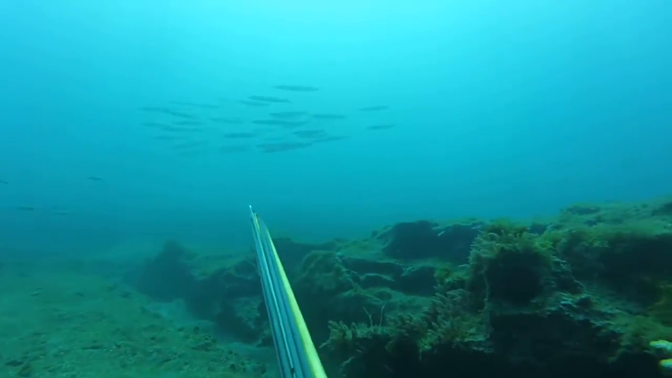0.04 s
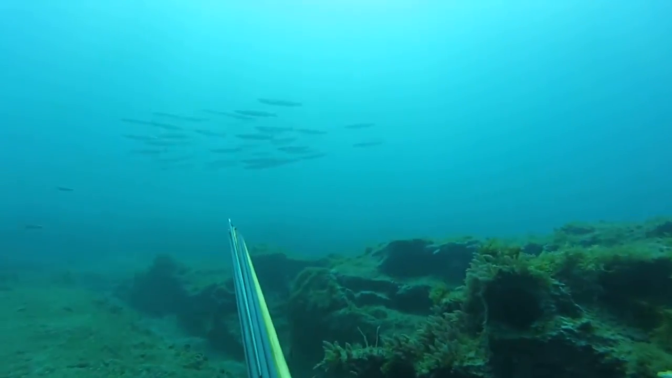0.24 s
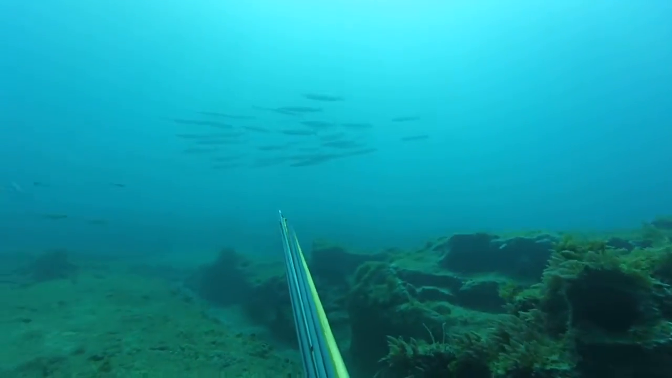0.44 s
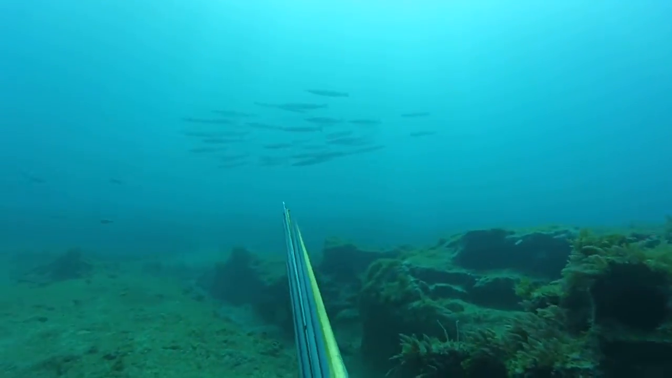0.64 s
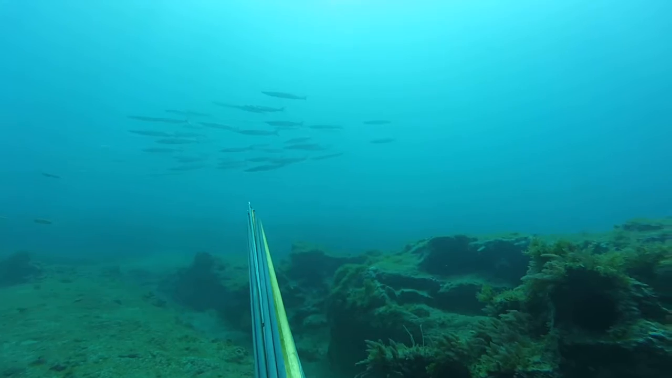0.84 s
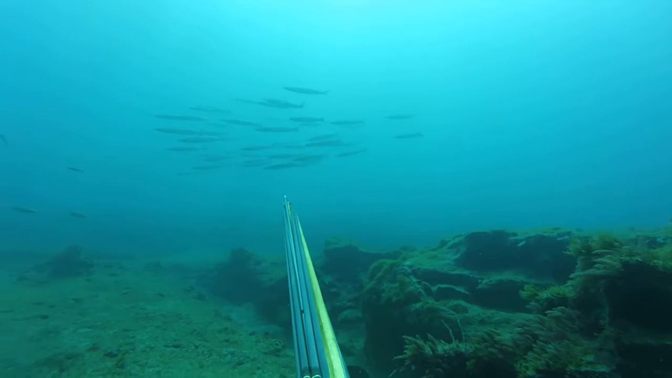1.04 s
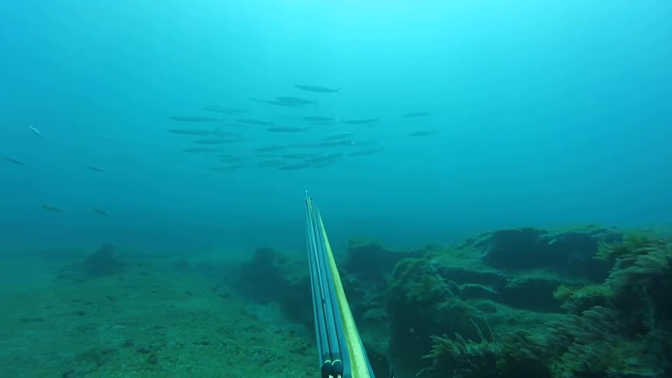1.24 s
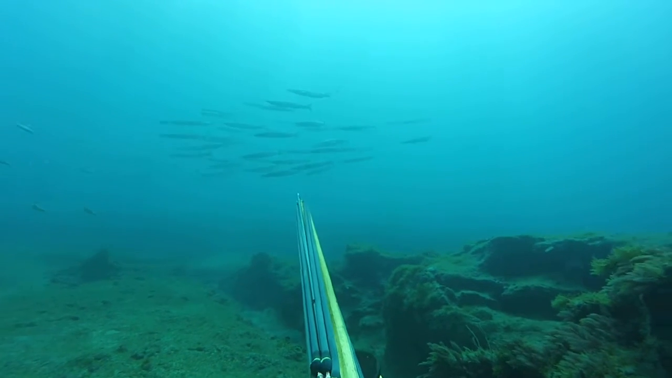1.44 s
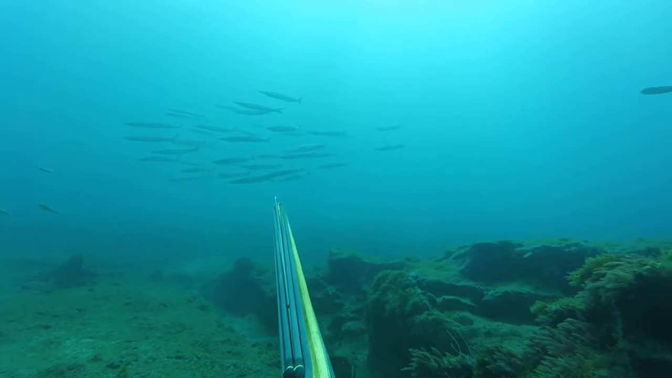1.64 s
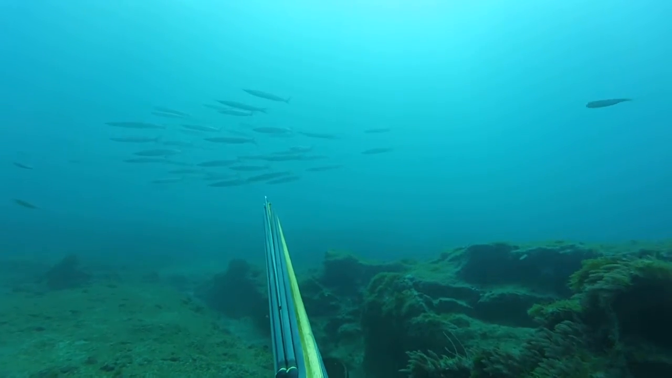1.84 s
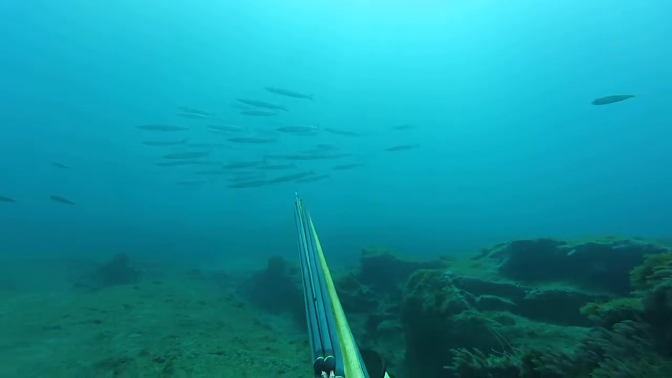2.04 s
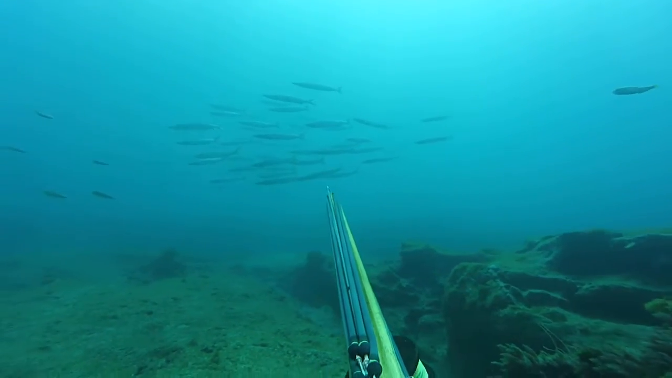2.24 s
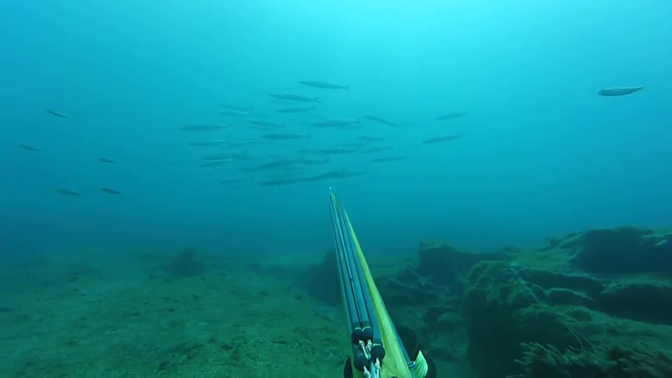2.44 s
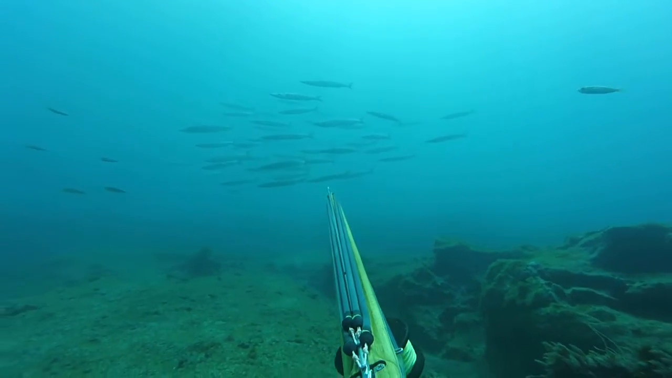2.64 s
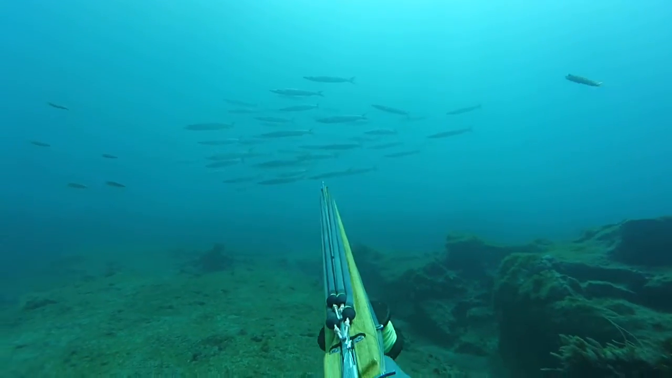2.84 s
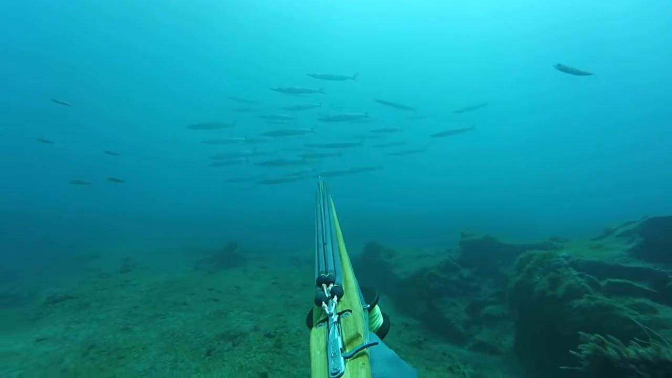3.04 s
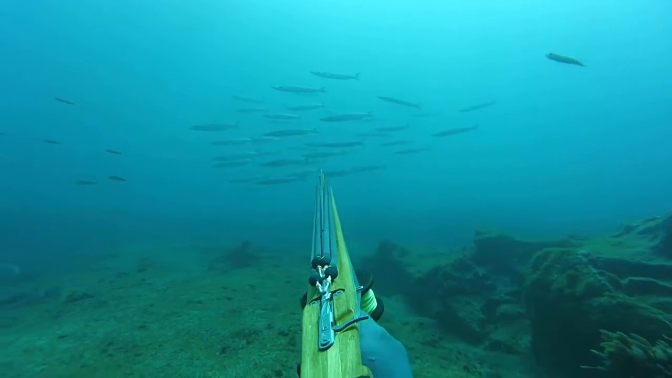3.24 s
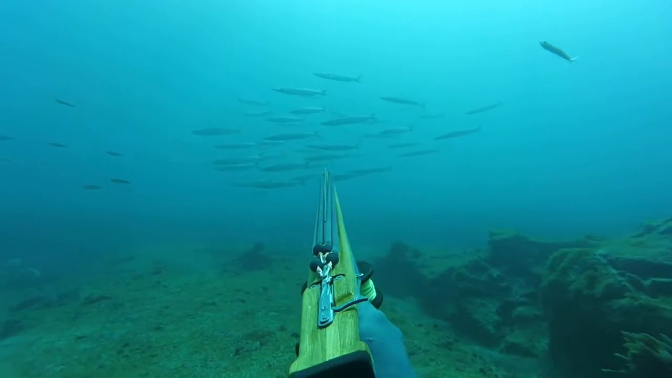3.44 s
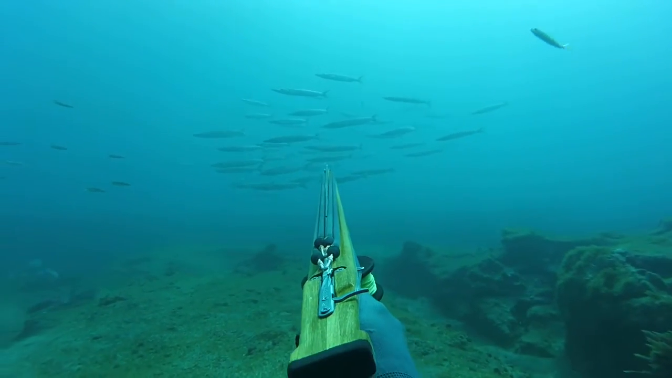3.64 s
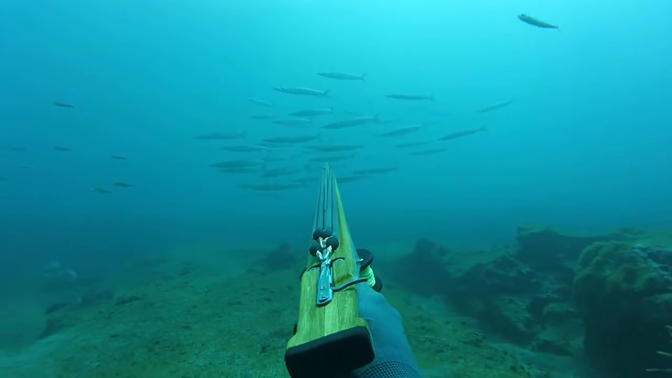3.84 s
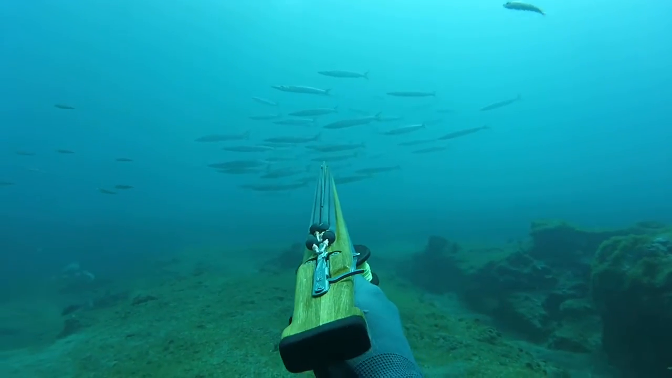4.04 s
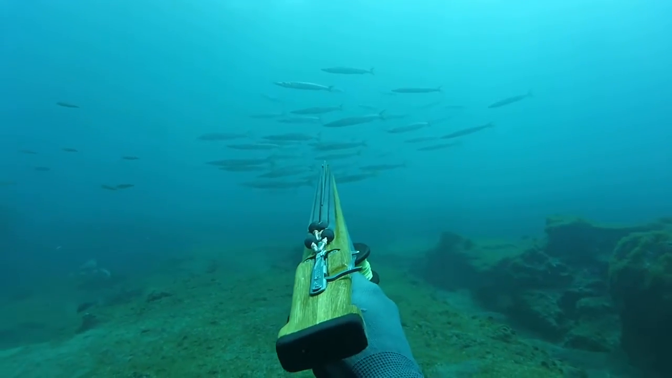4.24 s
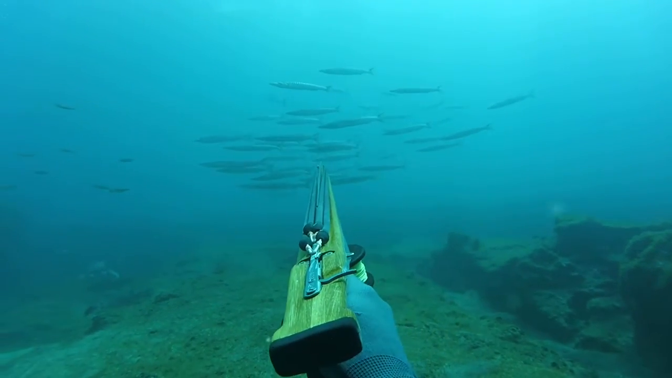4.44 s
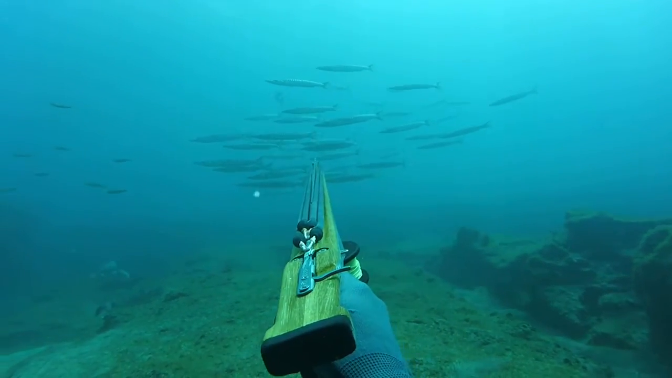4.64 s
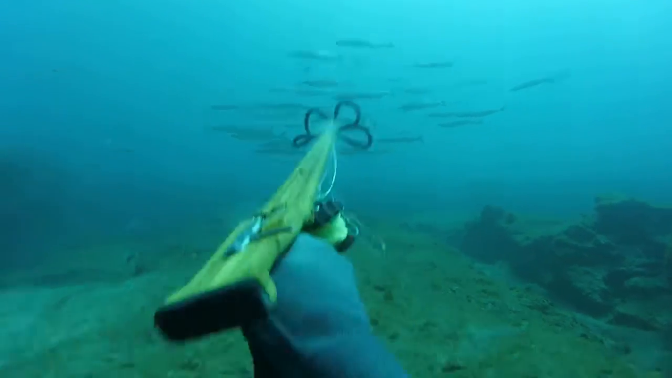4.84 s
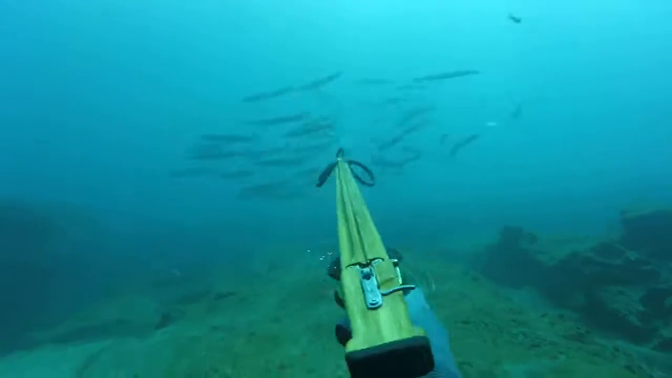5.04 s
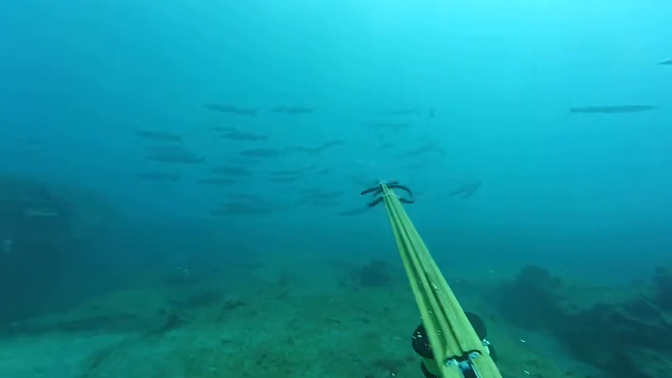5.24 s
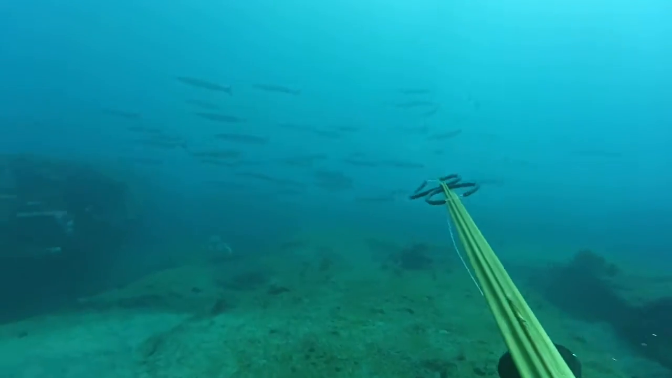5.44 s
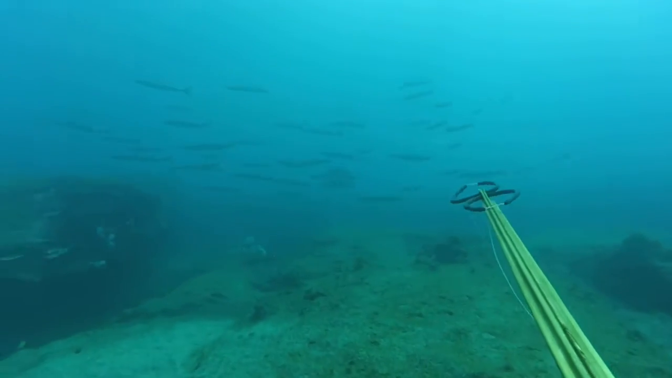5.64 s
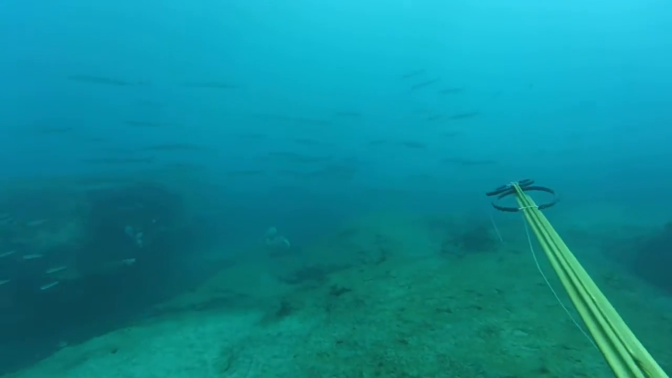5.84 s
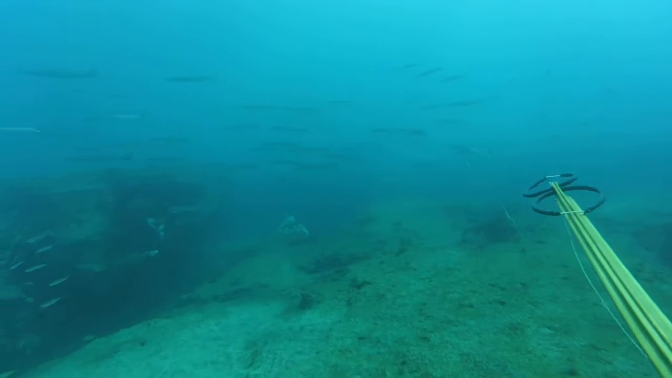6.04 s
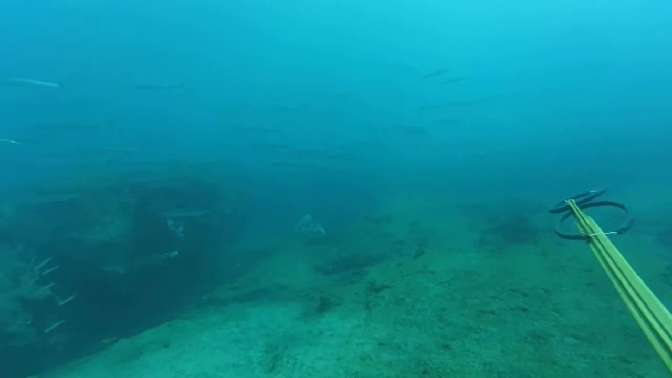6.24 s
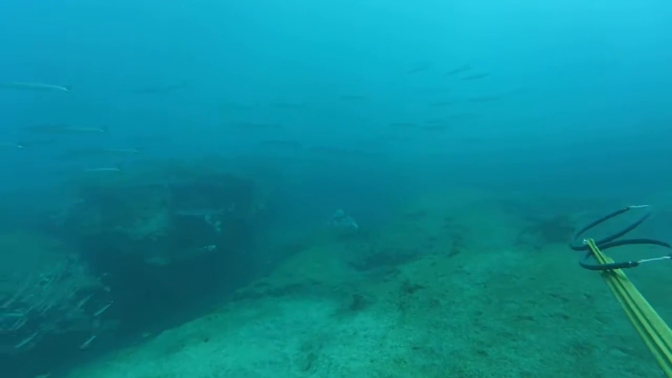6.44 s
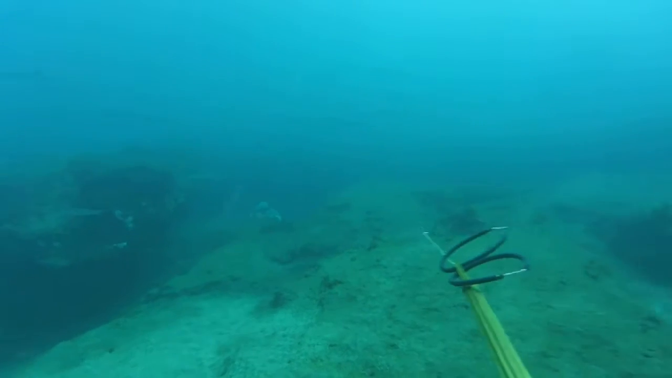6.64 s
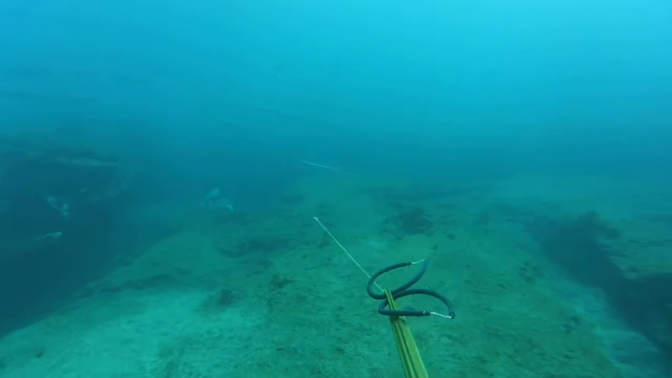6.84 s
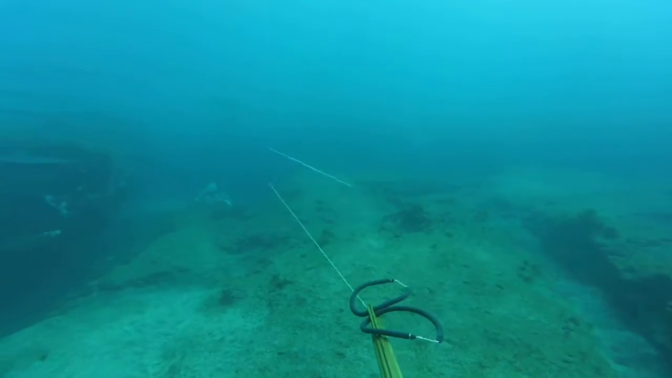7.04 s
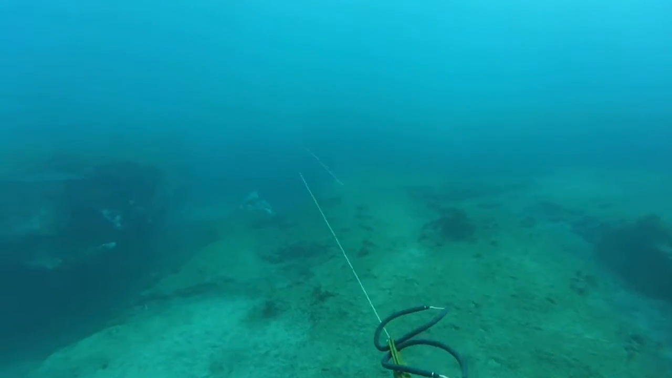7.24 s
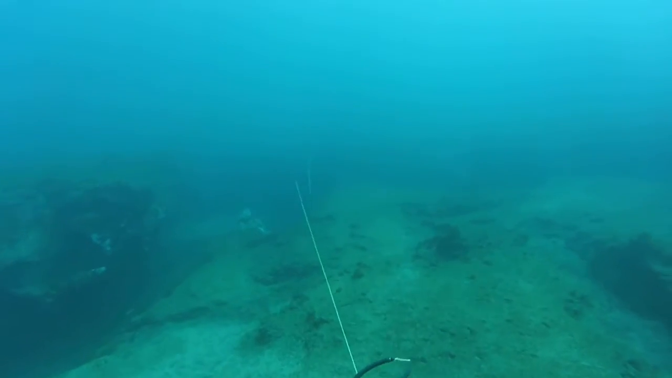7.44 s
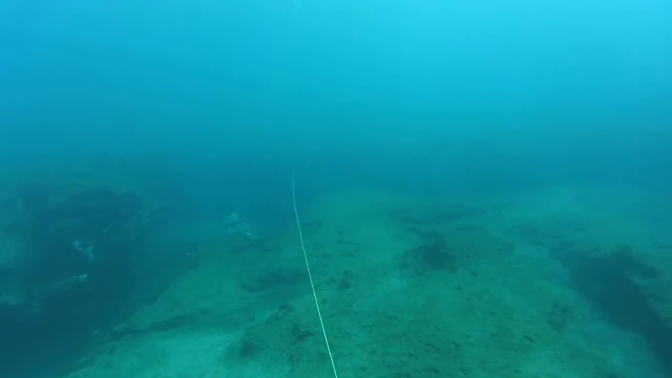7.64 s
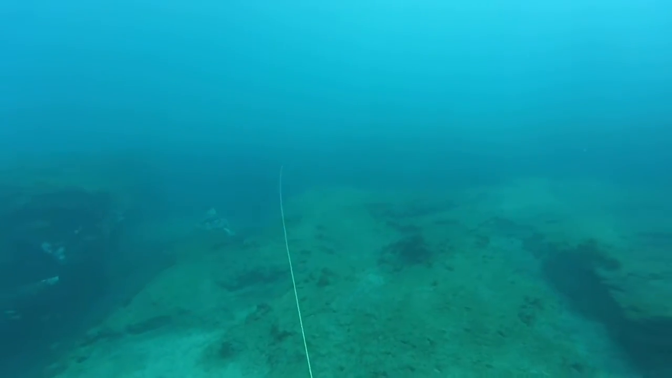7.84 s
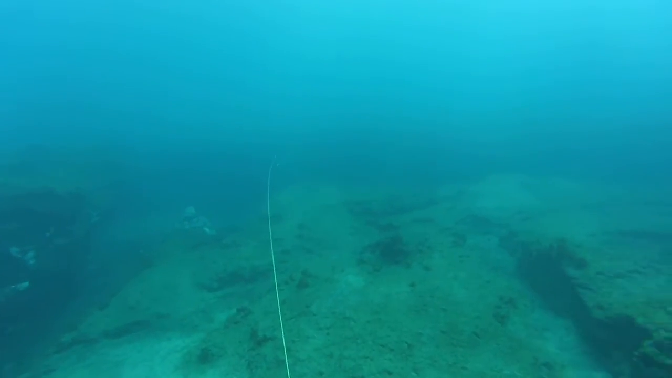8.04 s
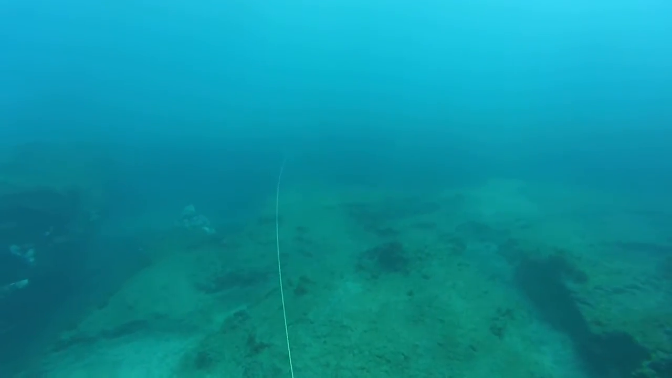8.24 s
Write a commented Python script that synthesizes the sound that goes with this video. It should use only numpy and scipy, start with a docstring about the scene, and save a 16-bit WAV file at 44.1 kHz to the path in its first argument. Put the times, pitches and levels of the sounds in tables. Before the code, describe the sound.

From 0 to 4.8 seconds it is quiet under water: a fine, steady sizzle of snapping shrimp, with brighter dry clicks standing out several times a second, boxy and slightly ringing in the camera housing. Faint low bumps come at times, the clearest a knock near 1.37. At 4.82 the speargun fires, enormously louder and distorted: a hard crack, a rasp swelling for a few hundredths of a second, metallic ringing, rapid slaps and clacks until about 5.0, and a deep kick with low watery surge. It dies away within half a second, while line flicks off in scratchy pitched ticks, weakening until 6.0. Soft bumps come around 6.6 to 6.8 as a reel spins up, whirring and hissing with about sixteen throbs a second near 7, then slowing and softening. A dull bump at 8.13 and a faint, wavering downward groan at 8.2 close it over crackle.

```python
"""A wooden speargun is fired under water: the shaft rasps along its track and overloads the camera.
Its rattle rings the gun, bands and line slap as clicks, and the water surges as low filtered noise.
Then ticking line whips off the stock and whirrs off a reel that throbs with each turn.
Snapping shrimp crackle throughout as clicks and tiny rings coloured by the camera housing.
Soft bumps on it and low clacks of the gun are damped swings; a low groan follows the last."""
import sys
import numpy as np
from scipy import signal
from scipy.fft import rfft, irfft, next_fast_len
from scipy.io import wavfile

SR = 44100
rng = np.random.default_rng(int(sys.argv[2]) if len(sys.argv) > 2 else 0)


def int16_out(signal):
    """Quantize to a 16-bit WAV file."""
    q = np.round(np.clip(np.atleast_2d(signal).T, -1, 1) * 32767)
    wavfile.write(sys.argv[1], SR, q.astype(np.int16))


N = 366030
RELEASE_S = 4.816  # the trigger lets go


def amp(db):
    """Decibels to gain."""
    return 10 ** (np.asarray(db) / 20)


def unit(x):
    """x at rms 1."""
    return x / np.sqrt(np.mean(x ** 2) + 1e-20)


def along(points, hz):
    """(Hz, value) points read on a log frequency axis."""
    f, v = np.transpose(points)
    return np.interp(np.log(hz + 1), np.log(f + 1), v)


def curve(rows, axis=1):
    """One column of (s, ..) rows as a value per sample."""
    rows = np.array(rows)
    return np.interp(np.arange(N) / SR, rows[:, 0], rows[:, axis])


def wobble(rate_hz):
    """A random curve through rate_hz normal-distributed knots a second."""
    knots = rng.standard_normal(1024)
    return np.interp(np.arange(N) * (rate_hz / SR), np.arange(1024), knots)


def swell(s, db, length_s):
    """Gain of a short rounded swell centred on time s."""
    return amp(db) / (1 + ((np.arange(N) / SR - s) / length_s) ** 4)


def stroke(start_s, end_s, start_db, end_db, after_db, t60_s, attack_s):
    """Gain that fades in just before start_s, ramps in dB until end_s, then dies away from after_db."""
    t = np.arange(N) / SR
    ramp_db = np.interp(t, [start_s, end_s], [start_db, end_db])
    db = np.where(t < end_s, ramp_db, after_db - 60 * (t - end_s) / t60_s)
    return amp(np.maximum(db, -200)) * np.clip((t - start_s) / attack_s + 1, 0, 1)


def add(track, s, sound):
    """Mix a sound into the track at time s."""
    part = track[max(round(s * SR), 0):][:len(sound)]
    part += sound[:len(part)]


def coloured(x, gain, size=2048):
    """x through the minimum-phase filter, size samples long, whose magnitude is gain(Hz)."""
    magnitude = np.maximum(gain(np.fft.rfftfreq(size, 1 / SR)), 1e-6)
    cepstrum = irfft(np.log(magnitude))
    cepstrum[1:size // 2] *= 2  # fold to the causal half
    cepstrum[size // 2 + 1:] = 0
    return signal.oaconvolve(x, irfft(np.exp(rfft(cepstrum))))[:len(x)]


def resonances(modes, hz):
    """Magnitude of a set of (Hz, width Hz, dB) resonances, summed in power."""
    return np.sqrt(sum(
        amp(db) ** 2 * (hz * w) ** 2 / ((c * c - hz * hz) ** 2 + (hz * w) ** 2)
        for c, w, db in modes))


def housing(hz):
    """Colour of a sharp click through the housing: a direct path plus ringing wall resonances."""
    # shrimp heard in the housing: (frequency [Hz], density level [dB])
    crackle_colour = [(180, -40.5), (300, -21.5), (532, -23.5), (898, -21.5), (1080, -17.5), (1290, -25.5),
                      (1540, -7), (2040, -6), (2360, 0.5), (2870, -6), (3120, -6.5), (5800, -13.5),
                      (6300, -21), (6950, -12.5), (15000, -20.5)]
    # wall resonances: (frequency [Hz], width [Hz], level [dB])
    wall_modes = [(1136, 110, -0.5), (1700, 480, -14.5), (2288, 93, -7), (3370, 280, -2), (6100, 690, -0.5),
                  (6810, 230, 0.5), (7800, 360, -1.5)]
    return amp(along(crackle_colour, hz)) * (.5 + resonances(wall_modes, hz))


def ticks(rate_hz, spread_db):
    """Random impulses of either sign at rms 1, with clipped log-logistic sizes."""
    when, size, sign = rng.random((int(rate_hz * N / SR), 3)).T
    size = np.clip(np.log(size + 1e-9) - np.log(1 - size), -5, 5) / 2
    impulses = np.sign(sign - .5) * amp(spread_db * size)
    return unit(np.bincount((when * N).astype(int), impulses, N))


def grains(rate_hz, hz, octaves, cycles, spread_db):
    """Random tiny decaying rings of rms 1, each with its own pitch and size."""
    when, pitch, size, phase = rng.random((int(rate_hz * N / SR), 4)).T[:, :, None]
    f = np.minimum(hz * 2 ** (octaves * (2 * pitch - 1)), .4 * SR)
    n = np.arange(SR // 160)
    turn = f * n / SR
    size_gain = amp(-spread_db * np.log(size + 0.03))
    rings = size_gain * np.sin(2 * np.pi * (turn + phase)) * np.exp(-turn / cycles)
    return unit(np.bincount(((when * N).astype(int) + n).ravel(), rings.ravel(), N)[:N])


def click(treble_db, low_db, burst_t60_s, tail_db, tail_t60_s):
    """A sharp burst of close reflections and a weak, duller scattered tail, through the housing."""
    t = np.arange(SR // 10) / SR
    burst, tail = rng.standard_normal((2, len(t))) * (1 - np.exp(-(t / 0.00043) ** 2))
    tail = signal.lfilter([.4], [1, -.6], tail)
    push = burst * amp(-60 * t / burst_t60_s) + tail * amp(tail_db - 60 * t / tail_t60_s)
    tilt = [(500, min(low_db, 0) - 1), (800, low_db - 4.5), (1300, low_db),
            (2300, 0.0044), (3600, 0.0037), (7000, treble_db)]
    sound = coloured(push, lambda hz: housing(hz) * amp(along(tilt, hz)), size=1024)
    return 0.2 * sound / np.sqrt(np.mean(sound[:SR // 200] ** 2))  # the first 5 ms set the level


def colony(dull_db=1, bright_db=1):
    """The snaps of one patch of reef, dull and bright, with that patch's own echoes off the rocks."""
    t = np.arange(SR // 20) / SR
    echo_gain = .13 * amp(-60 * t / .012) + .034 * amp(-60 * t / .08)
    scatter = rng.standard_normal(len(t)) * echo_gain
    scatter[0] = 1  # direct sound
    dull = grains(rate_hz=52, hz=3900, octaves=.8, cycles=.8, spread_db=4.5)
    bright = grains(rate_hz=87, hz=7470, octaves=0.86, cycles=0.74, spread_db=6.0)
    return signal.oaconvolve(amp(dull_db) * dull + amp(bright_db) * bright, scatter)[:N]


def shrimp(reef_db=-50.5, far_db=-0.5, near_db=4.0):
    """Far snaps merge into a sizzle; nearer colonies crackle, and the nearest snaps stand out as clicks."""
    # colour of the distant shrimp: (frequency [Hz], level [dB])
    reef_tilt = [(1000, 0), (2100, -1), (3300, 0.5), (4300, 0.5), (7000, 0.5), (11000, 1.5)]
    # nearest snaps: (time [s], relative level [dB], relative treble [dB], relative low-mid [dB])
    snaps = [(0.3568, -30.5, -25, -28), (0.4562, -30, -25, -33), (0.5124, -29, -15.5, -28.5),
             (0.5841, -28.5, -15, -28.5), (0.7221, -28, -22, -26), (0.754, -26, -15, -40),
             (0.8041, -26.5, -27, -25), (0.831, -29.5, -37, -19), (1.0217, -26, -23.5, -25),
             (1.1564, -26, -24, -20.5), (1.4677, -28, -28, -48), (1.693, -31.5, -19, -12),
             (1.7875, -22.5, -23.5, -24.5), (1.8463, -30.5, -14, -29), (2.0845, -22.5, -33, -27),
             (2.1535, -29, -23, -46), (2.393, -28, -17, -33), (2.591, -25.5, -30, -26),
             (2.6728, -25.5, -31, -33), (2.9567, -26, -25, -21.5), (3.074, -32, -21, -34),
             (3.1338, -29, -20, -31), (3.384, -21.5, -26, -34), (3.46, -33.5, -14, -30),
             (3.5381, -26, -16, -37), (3.9379, -27.5, -26, -30.5), (4.4712, -32, -25, -22),
             (4.5015, -31, -21, -23), (4.6574, -29.5, -9, -30.5), (5.3341, -24, -26, -22),
             (5.446, -28.5, -28, -21), (5.7759, -22.5, -25, -36.5), (5.8723, -25, -24, -26),
             (6.0384, -25.5, -13.5, -48), (6.152, -29, -21.5, -31), (6.1988, -25.5, -32, -36),
             (6.3654, -29, -20, -26), (6.504, -29, -10, -28), (6.5101, -22, -19, -37),
             (6.7552, -26.5, -19, -34), (6.9237, -30, -31, -20), (7.0538, -28.5, -42, -19),
             (7.6029, -22.5, -33, -28), (7.6755, -28, -14, -25), (7.86, -29.5, -32, -38),
             (8.1417, -22.5, -24.5, -32), (8.1832, -28, -32, -32)]
    all_treble_db, all_low_db = 13.5, 27  # tone shared by all near snaps
    nearer = unit(colony() + colony() + colony())
    farther = ticks(rate_hz=4300, spread_db=2.5)
    reef = coloured(amp(far_db) * farther + nearer, lambda hz: housing(hz) * amp(along(reef_tilt, hz)))
    out = amp(reef_db) * unit(reef)
    for s, db, treble_db, low_db in snaps:
        snap = click(treble_db + all_treble_db, low_db + all_low_db,
                     burst_t60_s=0.0081, tail_db=-15, tail_t60_s=0.13)
        add(out, s, amp(db + near_db) * snap)
    return out


def water(surge_db=-1, eddy_db=-3):
    """Water pushes slowly on the housing and small eddies flutter round it; the shot stirs up both."""
    # flow as the diver lies still, then swings the gun aside:
    # (time [s], relative surge level [dB], relative eddy level [dB])
    flow = [(0, -40, -63.5), (2.3, -42, -68.5), (4.6, -37.5, -68), (5.33, -20.5, -49), (5.6, -33, -61.5),
            (6.0, -36.5, -58), (6.27, -29.5, -58), (6.75, -34, -51.5), (7.7, -34, -57.5),
            (8.3, -28.5, -49.5)]
    # surge spectrum: (frequency [Hz], density level [dB])
    surge_colour = [(5, -9), (12, 10), (22, 1.5), (36, -4.5), (65, -17), (100, -30.5), (200, -48),
                    (400, -100)]
    # eddy spectrum: (frequency [Hz], density level [dB])
    eddy_colour = [(40, -42), (90, 5), (160, -2.5), (260, -8), (450, -18), (800, -24.5), (1500, -31.5),
                   (4000, -74.5)]
    wake_db, wake_hold_s, wake_sag_db_per_s, wake_t60_s = -13.5, 0.19, 36, 0.23
    wake_eddy_db = -12.5  # eddies of the wake against its surge
    surge = amp(surge_db + curve(flow, axis=1))
    eddy = amp(eddy_db + curve(flow, axis=2))
    spent_db = wake_db - wake_sag_db_per_s * wake_hold_s
    wake = stroke(RELEASE_S, RELEASE_S + wake_hold_s, wake_db, spent_db, spent_db, wake_t60_s,
                  attack_s=.002)
    slow = unit(coloured(rng.standard_normal(N), lambda hz: amp(along(surge_colour, hz)), size=32768))
    gusts = amp(2.8 * wobble(22))
    eddies = coloured(rng.standard_normal(N), lambda hz: amp(along(eddy_colour, hz)), size=4096)
    flutter = unit(eddies * gusts)
    return (surge + wake) * slow + (eddy + amp(wake_eddy_db) * wake) * flutter


def bumps(thud_db=-7):
    """Each bump on the housing or low clack of the gun is a heavily damped swing with a dull thud on it."""
    # bumps on the housing and low clacks of the gun: (time [s], pitch [Hz], relative level [dB])
    knocks = [(0.348, 257, -45), (0.471, 278, -49), (0.950, 167, -37.5), (1.078, 252, -45),
              (1.352, 135, -38), (1.371, 235, -35), (1.373, 890, -31.5), (2.04, 254, -43.5),
              (4.845, 470, -16), (4.863, 92, -18), (4.88, 127, -15), (4.946, 1030, -10.5),
              (4.956, 1040, -14), (4.998, 122, -23.5), (5.012, 195, -24), (5.294, 208, -30),
              (5.381, 245, -38), (6.594, 198, -40.5), (6.688, 202, -36.5), (6.783, 95, -33.5),
              (6.797, 164, -27), (8.128, 145, -23)]
    t60_cycles = 8.4  # swings until a knock has fallen 60 dB
    out, t = np.zeros(N), np.arange(SR // 3) / SR
    for s, hz, db in knocks:
        t60_s = t60_cycles / hz
        noise = rng.standard_normal(len(t))
        thud = unit(coloured(noise, lambda f: 1 / (1 + (f / (1.7 * hz)) ** 4.0)))
        swing = np.sin(2 * np.pi * hz * t) + amp(thud_db) * thud
        add(out, s, 1.44 * amp(db - 60 * t / t60_s) * (1 - np.exp(-t / 0.00089)) * swing)
    return out


def groan(waver=0.099):
    """A soft, wavering low tone slides downward after the last bump."""
    mid_s, level_db, length_s = 8.22, -45, .06
    mid_hz, sag_hz_per_s = 195, 450
    t = np.arange(N) / SR - mid_s
    hz = (mid_hz - sag_hz_per_s * np.clip(t, -.2, .2)) * (1 + waver * wobble(90))
    tone = np.sin(2 * np.pi * np.cumsum(hz) / SR)
    return swell(mid_s, level_db, length_s) * amp(1.8 * wobble(60)) * tone


def reel(spool_db=-49, hiss_db=-43.0, flutter_db=2):
    """The spool rubs on its drag, hardest once a turn; line hisses through the guide; both follow speed."""
    # the reel spins up and slowly runs down: (time [s], speed [turns/s])
    spin = [(6.55, 9.3), (6.7, 13.3), (6.93, 16.33), (7.25, 15.6), (7.5, 14.6), (8.3, 12.94)]
    # spool resonances: (frequency [Hz], width [Hz], level [dB])
    spool_modes = [(921, 96, 2.5), (1046, 126, 4.5)]
    # line in the guide: (frequency [Hz], density level [dB])
    guide_colour = [(400, -37.5), (800, -11.5), (1350, -15), (1800, 5.5), (2050, 0.5), (2350, 10),
                    (2900, -4.5), (3700, -0.5), (4600, -25.5), (9000, -35), (10800, -17.5), (13000, -58)]
    # the line jerks the spool into motion: (time [s], level [dB])
    tug_rows = [(6.556, -57), (6.71, -45.5)]
    tug_length_s = 0.025
    reference_turns_per_s = 15.7  # speed at which spool_db and hiss_db hold
    rub_s = 7.25  # a moment when the spool's high spot meets the drag
    drag_db_per_speed, hiss_db_per_speed = 4, 2.5  # dB per turn/s
    speed = curve(spin) * (np.arange(N) / SR > spin[0][0])
    turns = np.cumsum(speed) / SR
    angle = 2 * np.pi * (turns - turns[round(rub_s * SR)])
    # the spool is out of round
    throb_db = 3.3 * np.cos(angle) + 1.8 * np.cos(2 * angle) + 2 * np.cos(3 * angle)
    throb_db = throb_db + flutter_db * wobble(50)
    drag_ticks = ticks(rate_hz=1500, spread_db=1.5) * amp(throb_db)
    drag = unit(coloured(drag_ticks, lambda hz: resonances(spool_modes, hz) ** 2))
    guide_ticks = ticks(rate_hz=1800, spread_db=3) * amp(.8 * throb_db)
    guide = unit(coloured(guide_ticks, lambda hz: amp(along(guide_colour, hz))))
    excess = speed - reference_turns_per_s
    tugs = sum(swell(s, db, tug_length_s) for s, db in tug_rows)
    drag_gain = amp(spool_db + drag_db_per_speed * excess) + tugs
    return drag_gain * drag + amp(hiss_db + hiss_db_per_speed * excess) * guide


def line(rub_db=-3, chirp_db=-4):
    """Line whips off the stock loop by loop behind the flying shaft, rattling in small pitched ticks."""
    # loops of line: (time [s], relative level [dB], length [s])
    whips = [(4.989, -39, 0.023), (5.03, -34, 0.016), (5.069, -40.5, 0.013), (5.147, -43, 0.041),
             (5.209, -36, .025), (5.276, -42.5, 0.01), (5.395, -42, 0.033), (5.475, -46.5, 0.021),
             (5.76, -48.5, 0.1), (5.989, -44.5, .06)]
    # line rub spectrum: (frequency [Hz], density level [dB])
    rub_colour = [(350, -57.5), (600, -29), (791, -15.5), (1070, -4), (1310, -17), (1470, -10), (2330, -4),
                  (2880, -9), (3500, 1), (4570, -15), (7200, -15.5), (14000, -31)]
    chirps = grains(rate_hz=390, hz=4020, octaves=1.1, cycles=7.8, spread_db=4.0)
    rattle = ticks(rate_hz=1300, spread_db=4) + amp(chirp_db) * chirps
    flick_db = 1.5 * wobble(70)
    rub = unit(coloured(rattle * amp(flick_db), lambda hz: amp(along(rub_colour, hz))))
    return amp(rub_db) * sum(swell(s, db, length_s) for s, db, length_s in whips) * rub


def shot(ring_db=1, scrape_db=-4, clack_db=2):
    """The shaft chatters down its track and rings the gun; wishbone and bands slap, and the gun kicks."""
    # shaft and stock resonances: (frequency [Hz], width [Hz], level [dB])
    gun_modes = [(1180, 37, -5.5), (1617, 100, -1.5), (1830, 95, -3), (2310, 99, 1), (2410, 15, -15.5),
                 (2880, 20, -35), (3290, 180, -9), (3210, 27.6, -28), (3660, 18, -15.5), (4040, 40, -21.5)]
    # scrape spectrum: (frequency [Hz], density level [dB])
    scrape_colour = [(88, -33.5), (150, -11), (283, -4), (674, -42.5), (1070, 4.5), (1200, -28),
                     (1770, -16.5), (3820, -1.5), (4720, -19), (5840, -8.5), (6430, -16.5), (6940, -9.5),
                     (15000, -43.5)]
    # an early ringing knock on the housing, then blows of trigger, wishbone, bands and line on the gun:
    # (time [s], relative level [dB], relative treble [dB], relative low-mid [dB])
    clacks = [(1.377, -32, -24, 16), (4.815, -2, 6, 4), (4.818, 7.5, -16, -1), (4.857, 1, -9, 8),
              (4.867, -2.5, -4, -8), (4.882, -9, -2, -15), (4.889, -19, 2, -13), (4.918, -6, -16, -24),
              (4.928, -15, -12, -1), (4.945, -14, -13, 9), (4.97, -13, -11, -26), (5.008, -31, -3, -1),
              (5.026, -33, -10, -10)]
    # the kick, and the housing swaying after it: (time [s], frequency [Hz], level [dB], T60 [s])
    recoil = [(4.813, 56, 6.5, 0.11), (4.856, 10.37, -4.5, 1), (4.965, 21.25, -10, 0.76)]
    muzzle_s = 4.853  # the shaft leaves the gun
    start_db, end_db, after_db = -13.5, 0, -13.5  # rasp grows with shaft speed, then drops
    # the gun's ring dies away first; the scrape rattles on a little longer
    ring_t60_s, scrape_t60_s = 0.17, 0.27
    ring_tilt = [(500, -11.0), (1000, -3.5), (1700, 2.0), (4000, 5.0), (9000, -19.5)]  # (Hz, dB)

    def rasp(t60_s):
        """Gain of the shaft's run and what follows it."""
        return stroke(RELEASE_S, muzzle_s, start_db, end_db, after_db, t60_s, attack_s=.0015)

    chatter = ticks(rate_hz=2500, spread_db=1.5)
    ring = unit(coloured(
        chatter, lambda hz: resonances(gun_modes, hz) * amp(along(ring_tilt, hz)), size=8192))
    scrape = unit(coloured(
        ticks(rate_hz=6800, spread_db=5.0), lambda hz: amp(along(scrape_colour, hz))))
    out = amp(ring_db) * rasp(ring_t60_s) * ring + amp(scrape_db) * rasp(scrape_t60_s) * scrape
    for s, db, treble_db, low_db in clacks:
        clack = click(treble_db + 7.0, low_db + 12.5, burst_t60_s=0.021, tail_db=-16.5, tail_t60_s=.05)
        add(out, s, amp(db + clack_db) * clack)
    t = np.arange(SR) / SR
    for s, hz, db, t60_s in recoil:
        sway = np.sin(2 * np.pi * hz * t) * (1 - np.exp(-t / 0.0035))
        add(out, s, amp(db - 60 * t / t60_s) * sway)
    return out


def scene():
    """The sealed housing gives both channels the same sound."""
    sound = shrimp() + water() + bumps() + groan() + reel() + line() + shot()
    return np.array([sound, sound])


def record(dry):
    """The camera clips just below full scale, then cuts steeply above its band limit."""
    top_hz = 15500
    clipped = np.clip(dry, -.97, .97)
    m = next_fast_len(N + SR // 2)
    band = 1 / (1 + (np.fft.rfftfreq(m, 1 / SR) / top_hz) ** 120)
    return irfft(rfft(clipped, m) * band, m)[:, :N]


dry = scene()
out = record(dry)
int16_out(out)
```